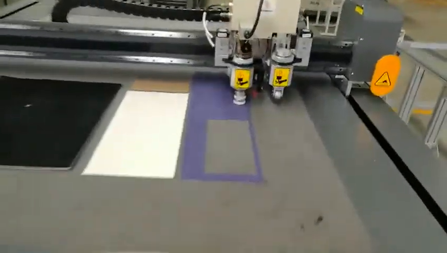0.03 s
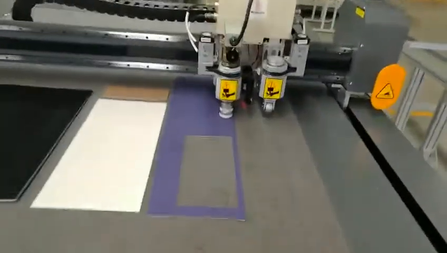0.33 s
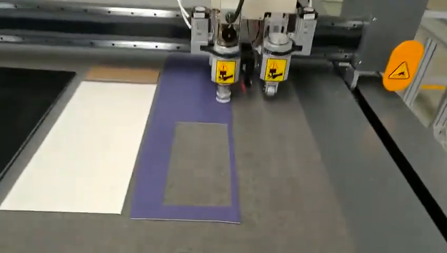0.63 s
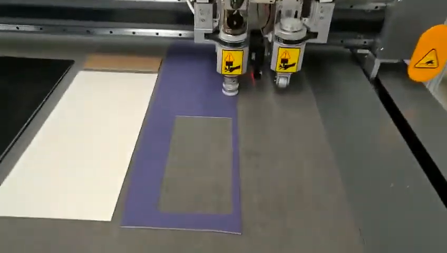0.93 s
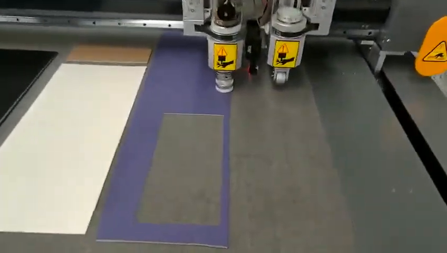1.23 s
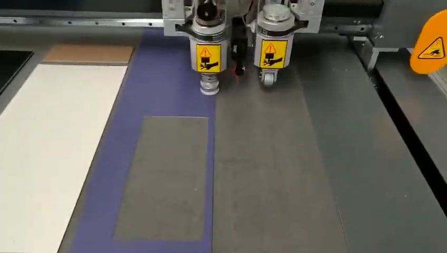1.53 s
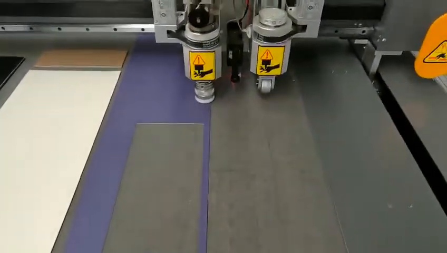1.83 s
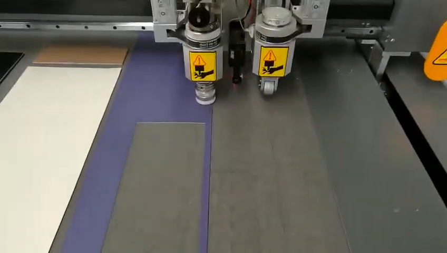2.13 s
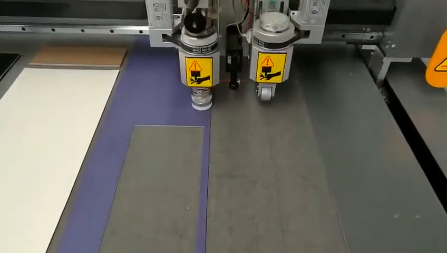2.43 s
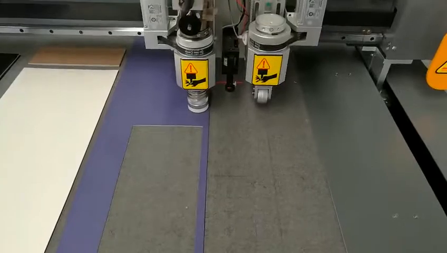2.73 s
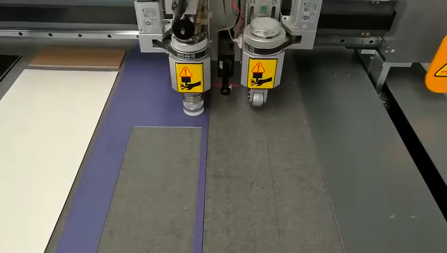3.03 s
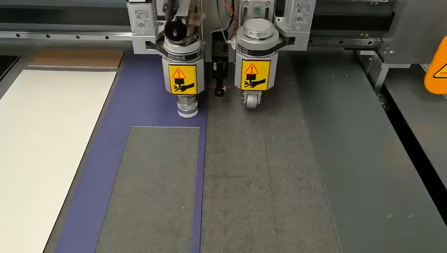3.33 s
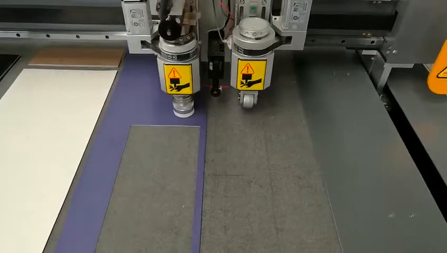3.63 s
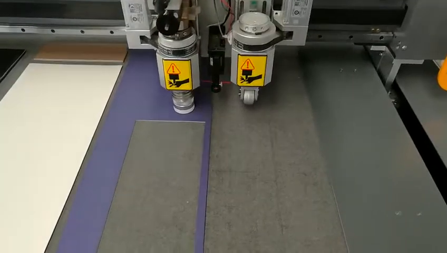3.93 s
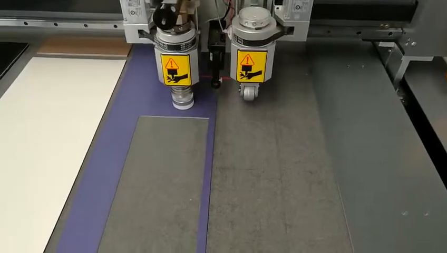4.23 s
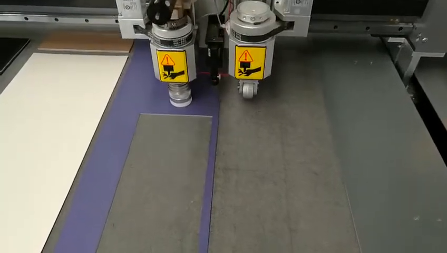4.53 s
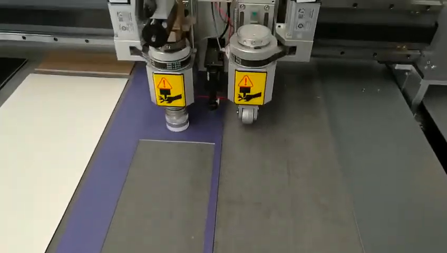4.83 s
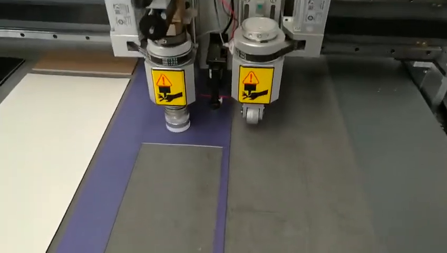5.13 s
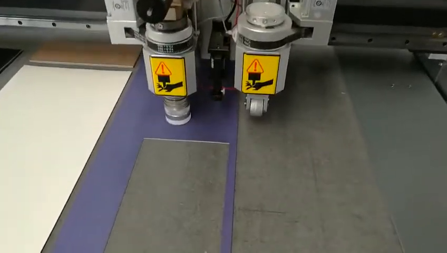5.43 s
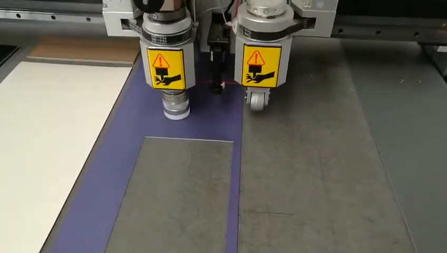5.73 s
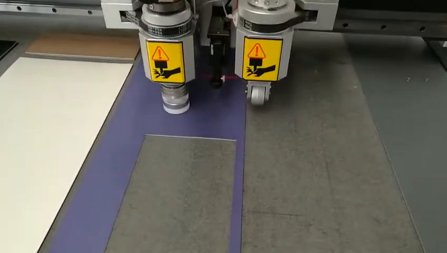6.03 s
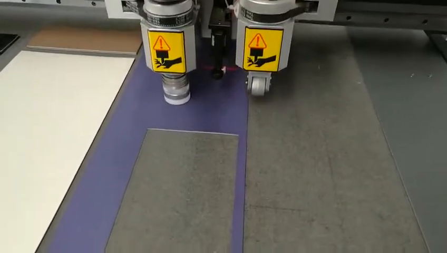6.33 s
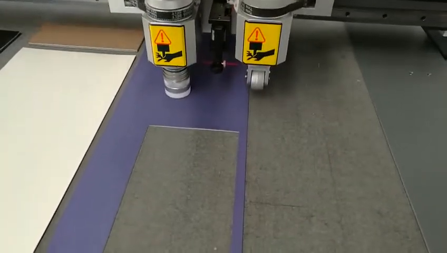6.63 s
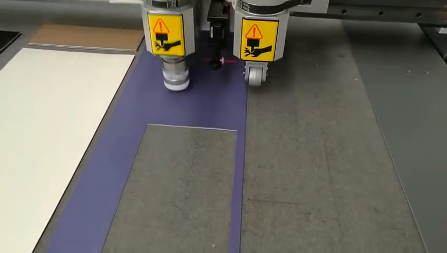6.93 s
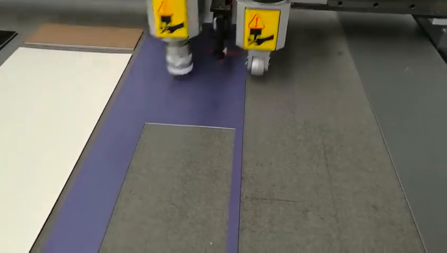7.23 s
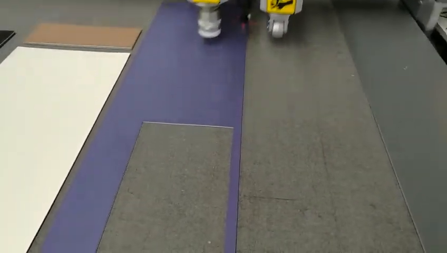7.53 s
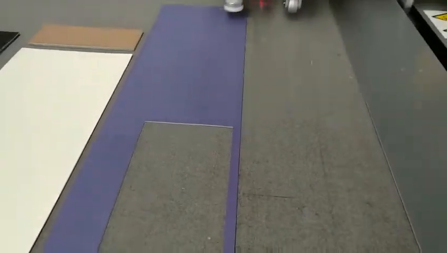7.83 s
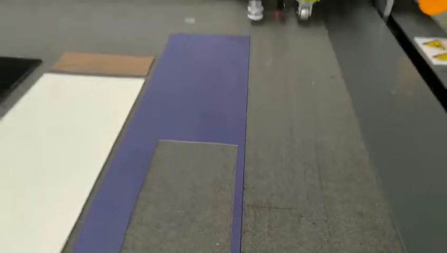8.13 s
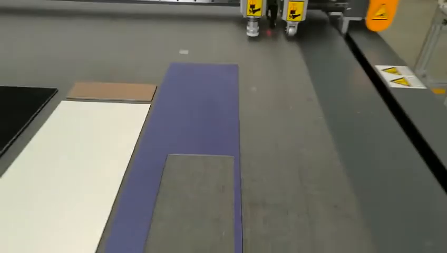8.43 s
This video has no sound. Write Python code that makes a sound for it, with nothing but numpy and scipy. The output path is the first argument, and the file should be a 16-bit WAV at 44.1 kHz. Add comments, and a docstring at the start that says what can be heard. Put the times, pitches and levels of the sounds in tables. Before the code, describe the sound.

In a workshop, a flatbed cutter's vibrating blade drones and whines at one pitch, with a metallic buzz and light friction hiss. The microphone approaches the tool, and a fluttering rasp builds in the tone. After about seven seconds comes a short metallic rattle, and the whine drops in pitch and dies abruptly. Soft air noise, mains hum and the faint high singing of the positioning motors are left.

```python
"""Oscillating knife of a flatbed cutter

The knife hums, whines and rubs at about 281 strokes a second as the microphone moves in.
Its belt drive flutters the overtones and flanks them with side tones. Near the end the blade lifts
and clatters, then the motor coasts to a jolting stop. Workshop ventilation and mains hum carry on,
joined by the thin tones of the gantry servos."""
import sys
import numpy as np
from scipy import signal
from scipy.fft import rfft, irfft, next_fast_len
from scipy.io import wavfile
from scipy.ndimage import map_coordinates

SR = 44100
rng = np.random.default_rng(int(sys.argv[2]) if len(sys.argv) > 2 else 0)


def file_out(sig):
    """Save sig as 16-bit WAV at sys.argv[1]."""
    # one column per channel
    cols = np.atleast_2d(sig).T
    # limit, then scale
    lim = np.clip(cols, -1, 1)
    pcm = np.round(lim * 32767).astype(np.int16)
    wavfile.write(sys.argv[1], SR, pcm)


N = 383229
TIME = np.arange(N) / SR

# pace of the knife under power: (time [s], stroke rate [Hz])
SPEED = [(0, 281.5), (1.2, 280.3), (2.3, 281.5), (4.9, 281.7), (6.27, 280.8), (6.74, 281.5), (6.92, 284.3),
         (7.04, 282.3)]
# the microphone moves in on the tool head: (time [s], closeness [0-1])
CLOSENESS = [(.5, 0.43), (1.5, 0.58), (2.4, 0.77), (4.4, 1), (7, 0.91)]
# the drive belt rattles under load: (time [s], depth [0-1])
BELT_RATTLE = [(0, 0.28), (3, 0), (4.9, 0.24), (5.35, 0.9), (6.3, 1), (6.9, 0.54)]
# the head jolts as the motor slows: (time [s], clatter [dB], hum [dB])
JOLTS = [(7.085, -22.5, -41), (7.115, -23, -52), (7.143, -26.5, -31), (7.24, -35.5, -37), (7.425, -52, -36)]

CUTTING_HZ, SWITCH_OFF_HZ = SPEED[0][1], SPEED[-1][1]
BELT_RATIO, MOTOR_RATIO = .173, .606  # turns per stroke
LIFT_S, OFF_S = 6.78, 7.04  # the blade leaves the sheet; the motor is switched off
RISE_S = .015  # attack of a burst


def amp(db):
    """Decibels to gain."""
    return 10 ** (np.asarray(db) / 20)


def unit(x):
    """Scale to rms 1."""
    return x / np.sqrt(np.mean(x ** 2) + 1e-20)


def along(points, hz):
    """Read (frequency, value) points on a log axis."""
    f, v = np.transpose(points)
    return np.interp(np.log(hz + 1), np.log(f + 1), v)


def curves(rows):
    """One envelope for each column after the time."""
    times, *columns = np.transpose(rows)
    return [np.interp(TIME, times, column) for column in columns]


def wobble(rate):
    """A smooth random curve, rate knots a second."""
    coarse = TIME[::32]
    knots = rng.standard_normal(int(TIME[-1] * rate) + 4)
    return np.interp(TIME, coarse, map_coordinates(knots, [coarse * rate]))


def burst(peak_s, db, db_per_s):
    """An envelope with a quick attack and an exponential decay."""
    age = TIME - peak_s
    return np.clip(1 + age / RISE_S, 0, 1) * amp(db - db_per_s * np.maximum(age, 0))


def filtered(x, response):
    """Shape x with a frequency response."""
    size = next_fast_len(N + SR // 2)
    return irfft(rfft(x, size) * response(np.fft.rfftfreq(size, 1 / SR)), size)[..., :N]


def widen(pair):
    """Blend two unrelated signals into stereo, near mono in the bass."""
    # stereo image: (frequency [Hz], left-right likeness [0-1])
    likeness = [(90, .999), (300, 0.73), (1000, 0.075), (2500, 0.043), (10000, 0.017)]
    turn = lambda hz: np.arccos(np.clip(along(likeness, hz), -1, 1)) / 2
    mid, side = filtered(pair, lambda hz: np.array([np.cos(turn(hz)), np.sin(turn(hz))]))
    return np.array([mid + side, mid - side])


def rush(spectrum):
    """Coloured stereo noise of rms 1."""
    return unit(widen(filtered(rng.standard_normal((2, N)), lambda hz: amp(along(spectrum, hz)))))


def ports(x, balance):
    """The two microphone ports favour different bands."""
    return filtered(x, lambda hz: 2 / (1 + amp(np.outer([-1, 1], along(balance, hz)))))


def stroke_rate(coast_s=.63):
    """The motor holds its speed, races a little without load, then friction stops it."""
    powered, = curves(SPEED)
    coast_left = np.clip(1 - (TIME - OFF_S) / coast_s, 1e-3, 1)
    return powered * coast_left ** 1.2


def flutter(angle, belt, motor, loose):
    """Uneven running: once a belt lap, once a motor turn, and at random."""
    lap, turn = rng.uniform(0, 2 * np.pi, 2)
    cyclic = belt * np.sin(BELT_RATIO * angle + lap) + motor * np.sin(MOTOR_RATIO * angle + turn)
    return cyclic + loose * wobble(120)


def head_shake(angle, speed, throb_hz=7.5, drop_db=21, drop_s=.077):
    """The reciprocating mass rocks the head: a throbbing hum that lurches once the motor is off."""
    # hum at the stroke rate: (time [s], level [dB])
    hum_levels = [(0.0, -26), (0.66, -28), (1.04, -23), (2.14, -19), (2.96, -24.5), (3.47, -19),
                  (4.0, -17.5), (4.71, -19.5), (5.76, -15.5), (5.82, -18), (6.9, -16), (7.04, -18)]
    # the hum reaches the two ports out of step: (time [s], left lead [rad])
    phase_lead = [(.4, 0.36), (1.2, -0.67), (2.2, -0.89), (4.7, -0.26), (6, -0.63)]
    level_db, = curves(hum_levels)
    lead = curves(phase_lead)[0] * speed / CUTTING_HZ
    sunk = 1 - np.exp(-(np.maximum(TIME - OFF_S, 0) / drop_s) ** 2)
    throb = amp(-38.5) * np.cos(2 * np.pi * throb_hz * (TIME - .045) + 0.45 * TIME * wobble(1.46))
    gain = (amp(level_db + 0.39 * wobble(9)) + throb) * amp(-drop_db * sunk)
    gain += sum(burst(s, db, db_per_s=300) for s, _, db in JOLTS)
    slowed = np.clip(1 - speed / SWITCH_OFF_HZ, 0, .3)
    lurch = amp(slowed * (11 * wobble(45) - 8.5))
    tone = np.sqrt(2) * np.sin([angle + lead / 2, angle - lead / 2]) / np.cos(lead / 2)
    return gain * lurch * tone * (1 + flutter(angle, belt=0.028, motor=0.0029, loose=0.012))


def leading_overtones(lift_takes_s=.06):
    """Envelopes in dB of the loudest overtones; lifting the blade shifts their balance."""
    # the body shifts with the listening position: (time [s], levels of orders 2, 3, 4, 5 [dB])
    body = [(0.0, -50, -27, -49, -47), (0.05, -41, -26.5, -50, -52), (0.26, -41.5, -28.5, -39.5, -39.5),
            (0.88, -40, -29.5, -45, -38.5), (1.45, -38.5, -35.5, -41, -36.5), (1.59, -39, -40.5, -44, -41),
            (2.23, -43, -36.5, -46, -35.5), (2.85, -45.5, -32, -48.5, -42), (3.55, -53, -38.5, -39.5, -43),
            (3.7, -47, -39.5, -39, -40.5), (4.51, -56, -26.5, -35, -39.5), (4.92, -43, -23.5, -36, -36.5),
            (5.37, -43.5, -23, -41, -48), (5.61, -41, -23.5, -41, -42), (5.82, -41, -26, -45, -47),
            (6.74, -41, -31, -48, -37)]
    # overtones that ring the head: (time [s], levels of orders 9, 10, 11, 12 [dB])
    ringing = [(0.0, -42, -32.5, -33.5, -37), (0.34, -37, -27, -31, -35.5),
               (0.67, -33.5, -32.5, -30, -31.5), (0.9, -37, -26, -25.5, -29), (1.41, -48, -31, -26.5, -31),
               (1.76, -31, -46, -33, -28), (2.1, -35.5, -39, -33, -29), (2.81, -32, -43, -35.5, -26.5),
               (3.85, -27, -40, -30, -26), (4.99, -29, -34.5, -39, -27.5), (5.14, -30, -46, -32.5, -27.5),
               (5.63, -33.5, -64, -33, -24), (6.7, -36, -32, -33.5, -24), (6.74, -39, -39, -32, -24.5)]
    # the overtones of body and ringing: (order [multiple of the stroke rate])
    orders = (2, 3, 4, 5, 9, 10, 11, 12)
    # their shift as the blade leaves the sheet: (gain [dB])
    lift_db = (-7, -3, 5, -6, 5, -2, -3, 0)
    lifted = np.clip((TIME - LIFT_S) / lift_takes_s + .5, 0, 1)
    cutting = curves(body) + curves(ringing)
    return {k: db + change * lifted for k, db, change in zip(orders, cutting, lift_db)}


def whine(angle, speed, count=40, throb_hz=7):
    """Stroke overtones coloured by the head; as the motor slows they collapse, high ones first."""
    # buzz of the weaker overtones: (frequency [Hz], relative level [dB])
    buzz = [(1690, -4), (1970, -1), (2250, 0), (3650, -2.5), (3940, -11), (4220, -10.5), (4500, -2.5),
            (4780, 1), (5060, -1), (5620, -4), (5900, -1), (6190, -3), (6470, -4), (6750, -15), (7000, -28),
            (8400, -30), (9400, -31), (11000, -34)]
    # the metallic edge shifts with the listening position: (time [s], gain in each of four bands [dB])
    edge_gains = [(.5, -8, -8, -1, -9), (1.3, 1, -4, 1, -6), (2.3, 3, -1, 2, -4), (4, -5, 0, -1, -2),
                  (4.8, -4, 2, -2, -4), (5.5, -1, 0, -2, 3), (6.5, -2, -2, -4, 1)]
    # those bands: (centre [Hz])
    edge_hz = (4500, 4900, 5900, 6450)
    near, = curves(CLOSENESS)
    rattle, = curves(BELT_RATTLE)
    edge_db = curves(edge_gains)
    leading = leading_overtones()
    timing = flutter(angle, belt=0.098, motor=0.033, loose=0.071)
    force = 1 + flutter(angle, belt=0.028, motor=0.023, loose=0.06)
    slowed_db = 20 * np.log10(np.minimum(speed / SWITCH_OFF_HZ, 1))
    crank = angle + .22 * np.clip(-slowed_db, 0, 1) * wobble(70)  # coasting strokes are uneven
    throb = 2 * np.pi * throb_hz * TIME + 1.4 * wobble(2.16)
    out = np.zeros((2, N))
    for k in range(2, count + 1):
        hz = k * CUTTING_HZ
        if k in leading:
            level_db = leading[k] + .5 * wobble(14) + 0.3 * wobble(4.03)
        else:
            level_db = -45.5 + 2 * near + along(buzz, hz) + wobble(1.08) + 1.24 * wobble(12)
        if 16 <= k <= 23:
            level_db += edge_db[np.argmin(np.abs(np.subtract(edge_hz, hz)))]
        level_db += min(0.061 * k, 1.3) * np.sin(throb + rng.normal(0, 1))
        level_db += min(k, 12) * slowed_db
        # the unequal paths to the ports matter more for short waves
        spread = min(0.058 * k, .7) * wobble(0.4)
        phase = k * crank + min(k / 10, 1) * timing + rng.uniform(0, 2 * np.pi)
        phase = phase + np.array([spread, -spread])
        # the belt makes each overtone beat, most of all the sixth and eleventh, where the head rings
        beat = rattle * (0.1 + 0.57 * (k in (6, 11)))
        out += np.sqrt(2) * amp(level_db) * (np.sin(phase) + beat * np.sin(phase + BELT_RATIO * angle))
    return out * force


def side_tones(angle, speed, count=24, scatter_db=3.2):
    """Belt laps and motor turns make no two strokes alike: weak tones rasp beside the overtones."""
    # colour of the rasp: (frequency [Hz], relative level [dB])
    rasp = [(330, -47.5), (800, -55.5), (2300, -53.5), (3100, -40.5), (3600, -43.5), (4000, -60.5),
            (6500, -66.5), (7000, -103)]
    rattle, = curves(BELT_RATTLE)
    orders = np.arange(1, count + 1)
    stroke = np.exp(1j * angle).astype(np.complex64)
    out = np.zeros(N)
    for offset in (BELT_RATIO, -BELT_RATIO, MOTOR_RATIO, 1 - MOTOR_RATIO):
        level_db = along(rasp, (orders + offset) * CUTTING_HZ) + rng.normal(0, scatter_db, count)
        phasors = amp(level_db) * np.exp(2j * np.pi * rng.random(count))
        series = np.polyval(phasors[::-1].astype(np.complex64), stroke)  # one partial per order
        out += np.real(series * np.exp(1j * (1 + offset) * angle))
    return np.sqrt(2) * amp(-15 + 6 * rattle) * out * np.minimum(speed / CUTTING_HZ, 1) ** 6


def blade_friction(angle, speed, catch_s=3.1):
    """The blade rubs and hisses, pulsing lightly with each stroke, and scrapes once where it catches."""
    # colours of the sliding, its airy top and the catch: (frequency [Hz], relative density [dB])
    rub_colour = [(60, -48), (170, -3.5), (260, 11), (420, -4), (700, -7), (1200, 1.5), (1900, -4.5),
                  (2600, 1.5), (3400, -1.5), (4000, -13.5), (5000, -5.5), (6400, -7.5), (7100, -32),
                  (14000, -55)]
    hiss_colour = [(5000, -53), (7500, -8), (9400, 4.5), (11000, -1.5), (14000, -5.5)]
    scrape_colour = [(600, -10), (1000, 1), (1300, -5), (2000, -36)]
    near, = curves(CLOSENESS)
    puffs = 1 + 0.051 * np.cos(angle) + flutter(angle, belt=0.074, motor=0.073, loose=0.031)
    rub = amp(-35.5 + 3 * near + 1.1 * wobble(10)) * rush(rub_colour)
    hiss = amp(-61.5 + 17 * near + 0.32 * wobble(12)) * rush(hiss_colour)
    scrape = burst(catch_s, db=-34.5, db_per_s=23) * rush(scrape_colour)
    return (rub + hiss + scrape) * puffs * (speed / speed.max()) ** 2.6


def reverb(x):
    """The workshop's echo: each frequency dies at its own speed."""
    # room decay: (frequency [Hz], time to fall 60 dB [s])
    decay = [(200, 0.59), (2500, 0.75), (10000, 0.23)]
    hz, t, noise = signal.stft(rng.standard_normal((2, SR)), SR, nperseg=256)
    tail = signal.istft(noise * amp(-60 * t / along(decay, hz)[:, None]), SR, nperseg=256)[1]
    return widen(signal.fftconvolve(x, tail / np.linalg.norm(tail[0]), axes=1)[:, :N])


def knife(stall_hz=88):
    """All the sounds of the tool follow its crank angle and fade as it stalls."""
    # panning of the tool: (frequency [Hz], left over right [dB])
    balance = [(330, 0), (560, 9.5), (800, 0.5), (1400, 0.5), (2000, 5), (2550, 8), (2800, 11), (3150, 35),
               (3450, 6.5), (3900, 4.5), (6000, 7.5), (8000, -3), (12000, -17)]
    speed = stroke_rate()
    angle = 2 * np.pi * np.cumsum(speed) / SR
    running = np.clip(2 * speed / stall_hz - 1, 0, 1)
    tone = (head_shake(angle, speed) + whine(angle, speed) + side_tones(angle, speed)) * running
    noise = blade_clatter(angle) * running + blade_friction(angle, speed)
    # the echo of a steady tone merges with it and stands apart only once the pitch falls
    coasting = np.clip((TIME - OFF_S) / 0.05, 0, 1)
    echo = amp(-6) * reverb(noise) + amp(-6.5) * coasting * reverb(tone)
    return ports(tone + noise + echo, balance)


def ventilation():
    """Moving air lays a soft bed of noise under the workshop."""
    # colour of the air: (frequency [Hz], relative density [dB])
    air_colour = [(22, -32), (45, -15), (82, -8.5), (151, -8), (225, -4.5), (420, -13.5), (684, -16.5),
                  (966, -12), (1700, -16), (2400, -15), (4370, -25.5), (5260, -26.5), (8030, -39.5),
                  (14000, -41.5)]
    return amp(-38 + 0.43 * wobble(3.9)) * rush(air_colour)


def mains_hum():
    """Mains and fans drone, wavering in level and phase."""
    # mains and fan tones: (frequency [Hz], level [dB])
    tones = [(49.8, -54.5), (99.8, -46.5), (200, -53), (242, -48.5), (340, -55)]
    out = np.zeros(N)
    for hz, db in tones:
        out += amp(db + 1.7 * wobble(7)) * np.sin(2 * np.pi * hz * TIME + hz / 250 * wobble(12))
    return np.sqrt(2) * out


def blade_clatter(angle):
    """The lifted blade knocks at both ends of its travel with uneven force and rings the head."""
    # resonances of the tool head: (frequency [Hz], width [Hz], relative level [dB])
    modes = [(450, 300, -5), (880, 110, 2.5), (1340, 70, 6), (1585, 39, 8.5), (2568, 84, 6.5),
             (3230, 580, -15), (3325, 134, 4.5), (5830, 1700, -19), (10000, 3600, -43)]

    def head(f):
        return sum((-1) ** k * amp(db) * 1j * f * width / (hz * hz - f * f + 1j * f * width)
                   for k, (hz, width, db) in enumerate(modes))

    settling = burst(LIFT_S + RISE_S, db=-26, db_per_s=44)
    force = np.max([settling] + [burst(s, db, db_per_s=144) for s, db, _ in JOLTS], axis=0)
    half_stroke = np.floor(angle / np.pi)
    ends = np.diff(half_stroke, prepend=0)
    # the down stroke lands every time; the rest is chance
    blows = ends * (2.8 * (half_stroke % 2) + rng.standard_normal(N) + .5 * rng.standard_normal((2, N)))
    return force * unit(filtered(blows, head))


def servos(fade_s=.069):
    """The gantry servos sing thin, wavering tones as they carry the head away."""
    # servo tones: (frequency [Hz], start [s], end [s], level [dB])
    tones = [(2530, 7.25, 8.3, -47), (2530, 8.3, 9, -41.5), (5060, 7.25, 8.3, -63), (4010, 8.3, 9, -54),
             (11983, 7.2, 8.3, -68)]
    out = np.zeros(N)
    for hz, start, end, db in tones:
        gate = np.clip(np.minimum(TIME - start, end - TIME) / fade_s + .5, 0, 1)
        out += gate * amp(db + 2 * wobble(19)) * np.sin(2 * np.pi * hz * TIME)
    return np.sqrt(2) * out


def scene():
    """The knife in its workshop."""
    # panning of the workshop: (frequency [Hz], left over right [dB])
    balance = [(400, -0.5), (1800, 1.5), (2500, 4.5), (3300, 10), (4200, 3), (5400, 7), (8000, -2),
               (12000, -12)]
    return knife() + ports(ventilation() + mains_hum() + servos(), balance)


def record(dry, top_hz=14300):
    """A steep low-pass trims the highest treble."""
    return filtered(dry, lambda hz: np.clip((top_hz - hz) / 50, 0, 1))


dry = scene()
out = record(dry)
file_out(out)
```